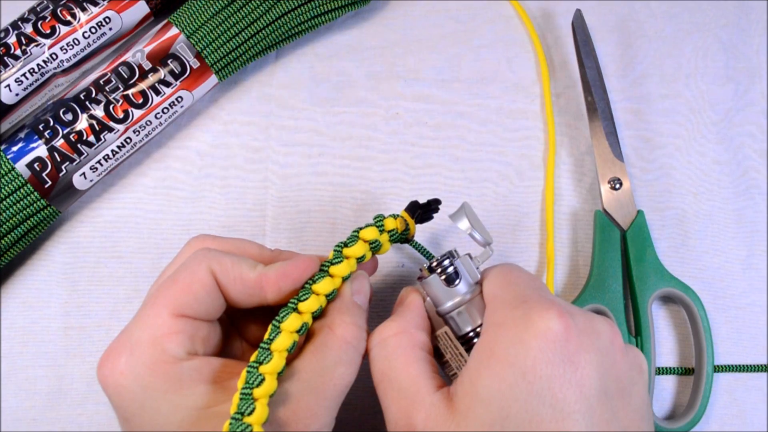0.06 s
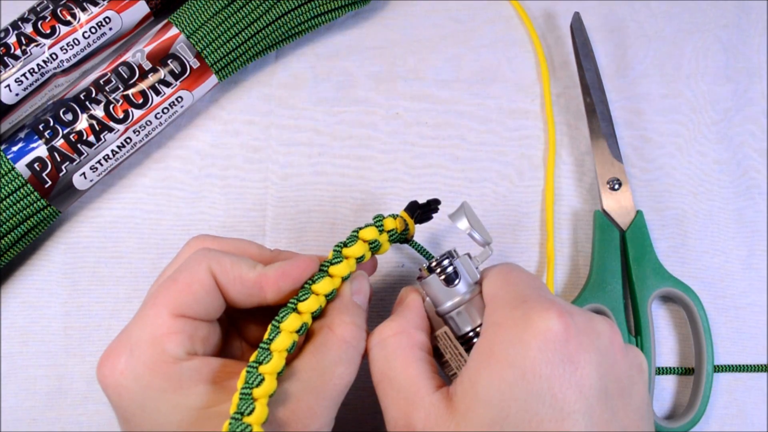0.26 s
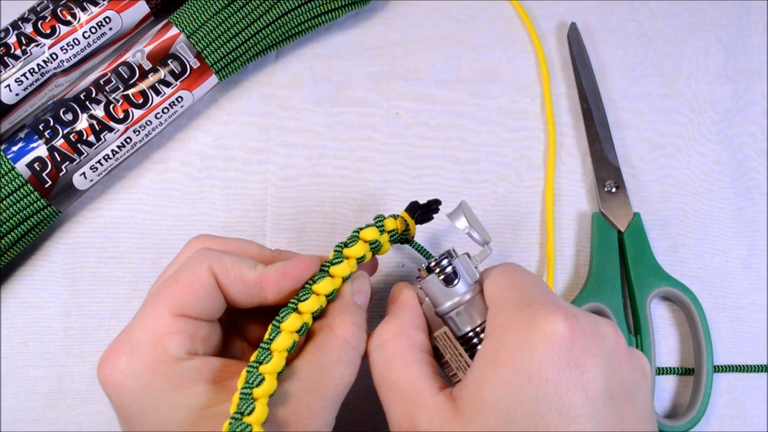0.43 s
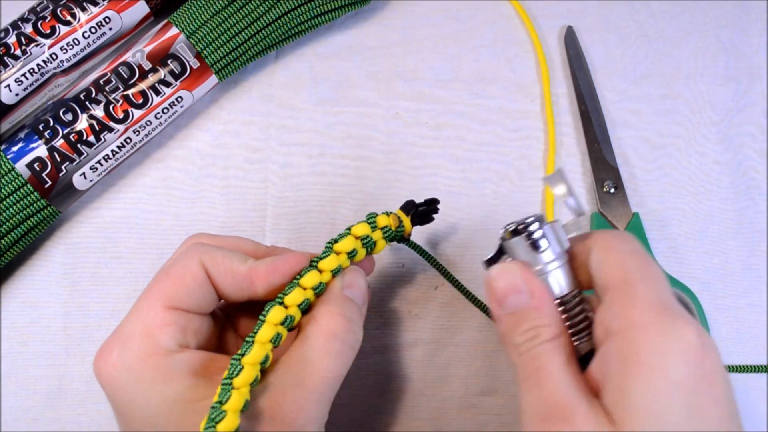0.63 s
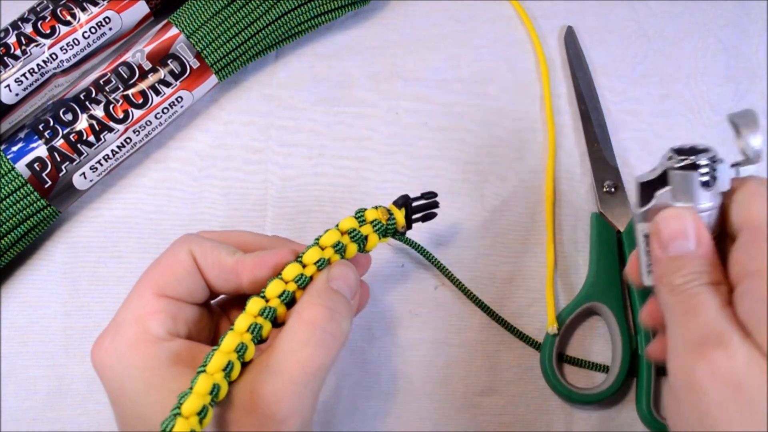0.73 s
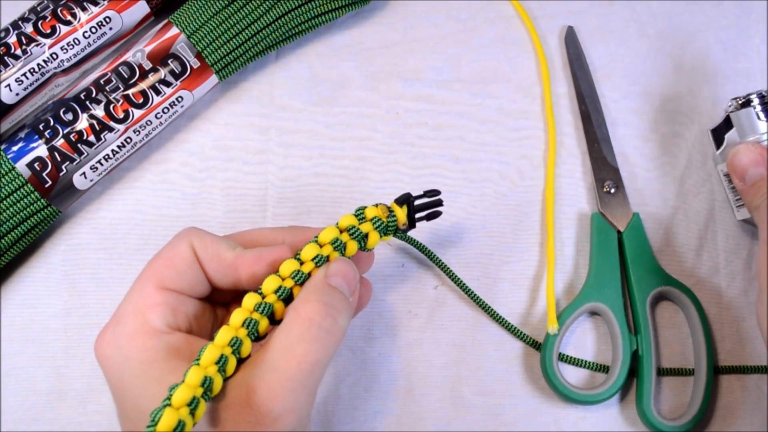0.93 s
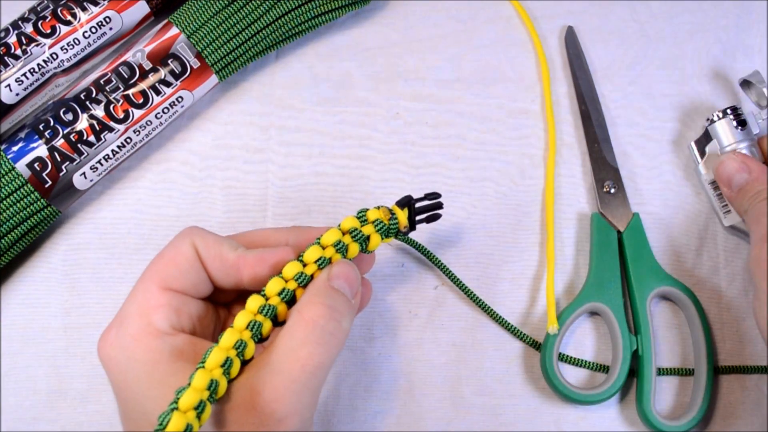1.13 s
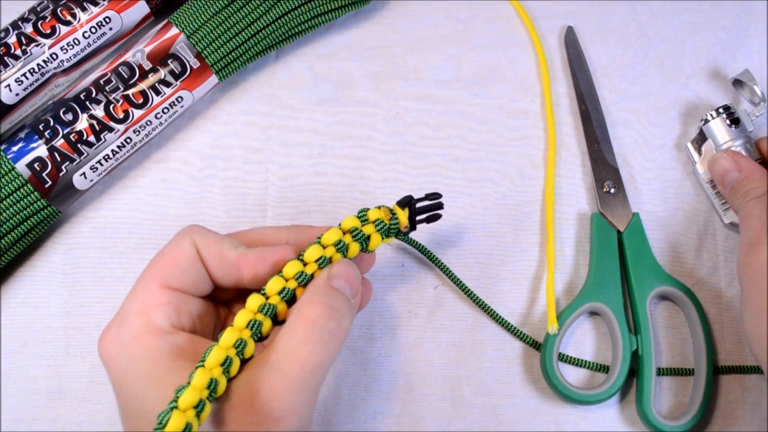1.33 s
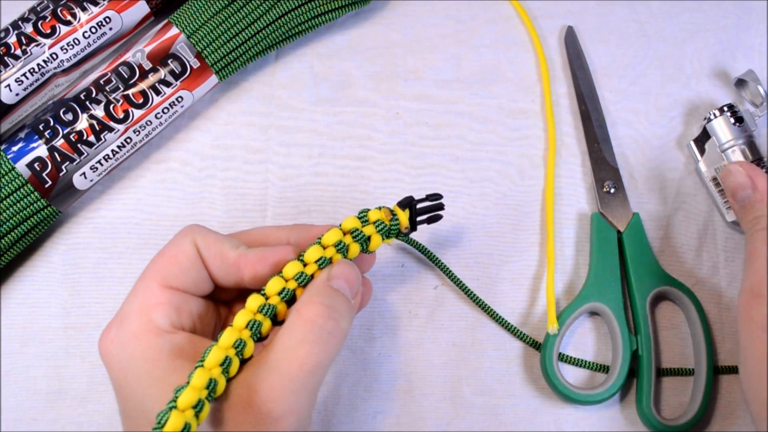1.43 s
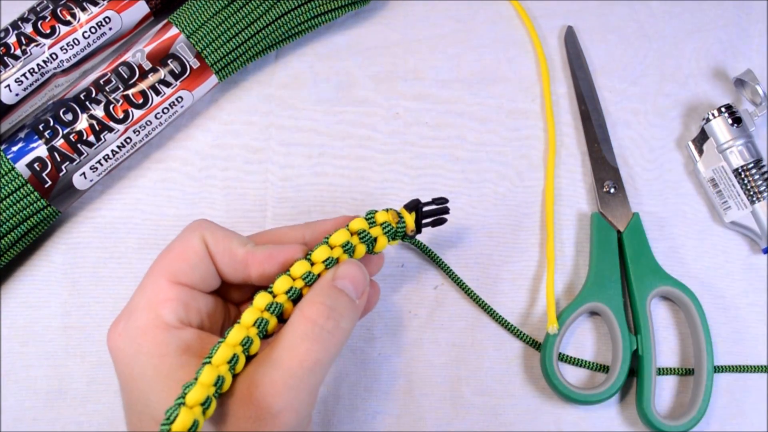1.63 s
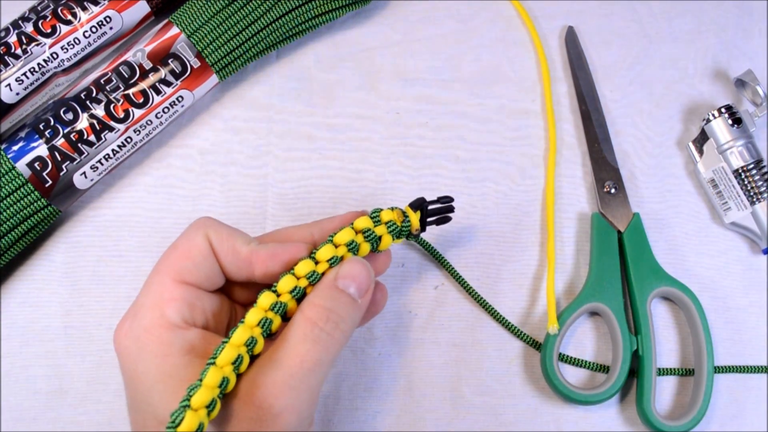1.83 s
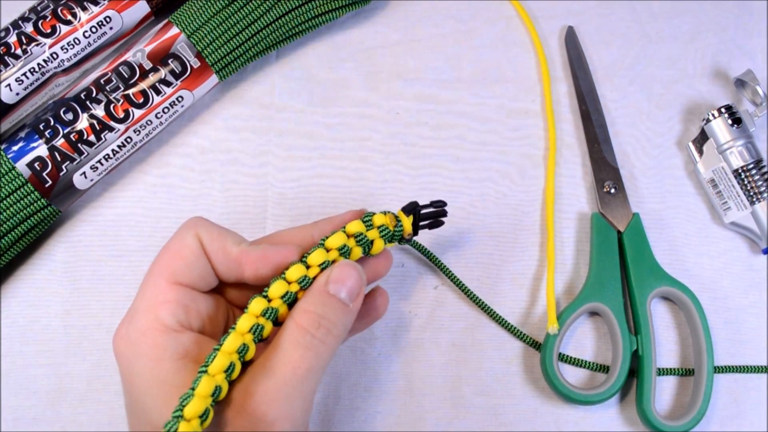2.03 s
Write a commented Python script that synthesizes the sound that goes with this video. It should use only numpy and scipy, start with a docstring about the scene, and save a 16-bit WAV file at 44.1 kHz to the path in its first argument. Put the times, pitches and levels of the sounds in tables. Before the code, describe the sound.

A jet lighter hisses steadily, close and slightly whistling, until 0.6 seconds, when a loud, hollow table bump rattles steel scissors. The hiss turns breathier, swells brightly around 0.9 with small hand brushes, then dulls and fades by 1.5. A softer thump at 1.2 leads into faint cloth rubbing. Another dull knock comes at 1.9, then a tiny hard clink at 2.05. Quiet small room, faint hum and thin whine.

```python
"""A jet lighter hisses against a cord end, close to the microphone, then swings clear and fades as it turns away:
turbulent noise, coloured by a reflection from the table. The hand bumps the table and rattles a pair of steel
scissors, lands again, slides over the cloth and lays the lighter down with a knock and a small clink:
damped modes and bursts of noise. A quiet room hums behind: steady tones and coloured noise."""
import sys
import numpy as np
from scipy import signal
from scipy.fft import rfft, irfft, next_fast_len
from scipy.io import wavfile
from scipy.ndimage import map_coordinates

SR = 44100
rng = np.random.default_rng(int(sys.argv[2]) if len(sys.argv) > 2 else 0)


def master(y):
    """Save y as 16-bit WAV."""
    cut = np.clip(np.atleast_2d(y).T, -1, 1)
    pcm = np.round(cut * 32767)  # scale
    wavfile.write(sys.argv[1], SR, pcm.astype(np.int16))


N = 91816


def amp(db):
    """Decibel law: the amplitude gain of a level in dB."""
    return 10 ** (np.asarray(db) / 20)


def unit(x):
    """Normalisation: x at rms 1."""
    return x / np.sqrt(np.mean(x ** 2) + 1e-20)


def along(points, hz):
    """Logarithmic frequency scale: (hz, value) points interpolated along it."""
    f, v = np.transpose(points)
    return np.interp(np.log(hz + 1), np.log(f + 1), v)


def curves(rows):
    """Linear interpolation in time: one value per sample for each column after the time."""
    s, *columns = np.transpose(rows)
    return [np.interp(np.arange(N) / SR, s, column) for column in columns]


def wobble(rate):
    """Slow random modulation: a smooth curve through random knots, rate of them a second."""
    knots = rng.standard_normal(1024)
    return map_coordinates(knots, [np.arange(N) * rate / SR], mode="mirror")


def filtered(x, response):
    """Linear filtering: the spectrum of x times a response of frequency."""
    m = next_fast_len(N + SR // 2)
    spectrum = rfft(x, m) * response(np.fft.rfftfreq(m, 1 / SR))
    return irfft(spectrum, m)[..., :N]


def noise(spectrum):
    """Coloured noise: white noise shaped by a spectral density, at rms 1."""
    return unit(filtered(rng.standard_normal(N), lambda hz: amp(along(spectrum, hz))))


def bands(rows):
    """Resonance driven by noise: narrow bands from rows of (centre_hz, width_hz, rms_db)."""
    total = np.zeros(N)
    for hz, width, db in rows:
        band = filtered(rng.standard_normal(N), lambda f: 1 / (1 + (1.24 * (f - hz) / width) ** 2))
        total += amp(db) * unit(band)
    return total


def fade(t, t60):
    """Exponential decay: 60 dB down after t60 seconds."""
    return np.exp(-np.log(1000) * t / t60)


def ring(modes, t, tilt_db=0, pivot_hz=350):
    """Modal superposition: damped sines, tilted in dB per octave about a pivot, varied at each blow."""
    total = 0
    for hz, db, t60 in modes:
        gain = amp(db + tilt_db * np.log2(hz / pivot_hz) + rng.normal())
        total = total + gain * fade(t, t60) * np.sin(2 * np.pi * hz * t)
    return total


def add(track, s, sound):
    """Superposition: mix a sound in from time s."""
    start = round(s * SR)
    track[start:] += sound[:N - start]


def flame():
    """Jet turbulence radiates broadband noise; the table reflection lags and so comb-filters it."""
    # flame playing on the cord: time_s, level_db
    on_cord = [(0, -35), (.1, -35), (.6, -35), (.68, -36), (.76, -38.5), (.85, -56), (1, -67)]
    # flame in open air: time_s, level_db, treble_db as the nozzle faces or leaves the microphone
    in_air = [(.6, -51, -2), (.66, -41.5, -7), (.74, -41.5, -3.5), (.79, -39.5, 5), (.83, -36, 5),
              (.855, -36.5, 2), (.9, -32, 2), (.95, -35.5, 0), (.99, -36.5, 2.5), (1.03, -38, -1),
              (1.07, -41, -0.5), (1.17, -40.5, -3.5), (1.29, -45.5, -8.5), (1.42, -53.5, -14),
              (1.56, -85, -15)]
    # delay of the table reflection, growing as the lighter lifts: time_s, lag_ms
    table_lag = [(.6, 0.3706), (.7, .38), (.8, .47), (.87, 0.5), (1, 0.73), (1.15, 0.93), (1.5, 1)]
    # relative spectral densities of the two jets: frequency_hz, density_db
    cord_jet = [(40, -39), (100, -23), (150, -15.5), (330, -12), (480, -11.5), (660, -9.5), (800, -3.5),
                (1200, -8.5), (1600, -1.5), (2100, -10.5), (2600, -12.5), (3100, -15.5), (3700, -11),
                (4400, -20.5), (4800, -17.5), (5400, -19.5), (6600, -18.5), (7900, -27), (8650, -25.5),
                (9400, -10), (10200, -18.5), (10950, -19), (12300, -27.5), (15500, -33)]
    air_jet = [(40, -34), (100, -17), (145, -8.5), (220, -11.5), (340, -5), (480, -5.5), (640, -2),
               (800, 3.5), (1050, 0), (1250, 0), (1600, 1), (2200, -2.5), (3000, -7), (3800, -10.5),
               (6000, -13), (8700, -19), (9800, -14.5), (11000, -17), (13000, -31), (15500, -38)]
    # resonances of the pocket between hand and nozzle: centre_hz, width_hz, level_db against the jet noise
    pocket = [(940, 33, -12.5), (1095, 50, -5), (1445, 58, -8), (1555, 15, -11), (2020, 120, -10),
              (2255, 87, -15), (2870, 110, -20.5)]
    # faint airy pitch of the jet on the cord: centre_hz, width_hz, level_db against the jet noise
    whistle = [(800, 24, -13.5)]
    treble_hz, flutter_db, table_echo = 3330, 0.62, 0.4  # echo as an amplitude ratio

    cord_db, = curves(on_cord)
    air_db, treble_db = curves(in_air)
    lag_ms, = curves(table_lag)
    cord_noise = unit(noise(cord_jet) + bands(pocket) + bands(whistle))
    free = noise(air_jet)
    roar = filtered(free, lambda hz: 1 / (1 + (hz / treble_hz) ** 4))
    air_noise = roar + amp(treble_db) * (free - roar)
    jet = amp(cord_db) * cord_noise + amp(air_db) * air_noise
    jet = jet * amp(flutter_db * wobble(45.6))
    reflection = map_coordinates(jet, [np.arange(N) - lag_ms * SR / 1000])
    return jet + table_echo * reflection


def near_walls(x):
    """Early reflections: eight equally strong delayed copies interfere and ripple the spectrum."""
    longest_s = 0.014
    lags = rng.uniform(longest_s / 10, longest_s, size=8)
    return sum(np.pad(x, (round(lag * SR), 0))[:N] for lag in lags) / np.sqrt(len(lags))


def bumps():
    """Impact excitation: a soft contact flexes the table top, rings its modes and leaves a dull thud."""
    # contacts with the table: start_s, level_db, tilt_db per octave, contact_ms
    blows = [(0.6035, -14, -3.5, 0.4), (0.6231, -29.5, 8.5, 0.38), (0.6508, -32.5, -8, 0.92),
             (1.1891, -23.5, 1, 0.55), (1.9049, -23, -2.5, 1.35), (1.9213, -44, -2, 1.3),
             (1.983, -41.5, -6.5, 1.6), (2.009, -47.5, -1, 0.44), (1.847, -49.5, 2, 1.1)]
    # modes of the table top: pitch_hz, level_db, t60_s
    table_modes = [(146, -6, 0.23), (201.8, 0, 0.11), (241, -2.5, 0.072), (306.6, -3.5, 0.14),
                   (322, -12.5, 0.17), (406, -7.5, 0.1), (458, -5, 0.12), (494.5, -6, 0.11),
                   (497, -14, 0.11), (599, -12.5, 0.16), (706, -5.5, 0.047), (819, -13.5, 0.18),
                   (867, -19, 0.13)]
    # relative density of the table's crowded resonances, heard as noise: frequency_hz, density_db
    thud_spectrum = [(50, -48), (130, -6.5), (250, -4.5), (500, -3), (750, -11.5), (1200, -14.5),
                     (2500, -47), (6000, -52)]
    knock_hz, knock_db, knock_t60_s = 410, 11.5, 0.015  # the first flex of the board under the blow
    mode_rise_s = 0.0013  # the modes build up as the wave crosses the board
    thud_t60_s, thud_rise_s = 0.15, 0.0033
    bass_cut_hz = 92  # the microphone picks up little deep bass from the blows

    out, t = np.zeros(N), np.arange(N) / SR
    knock = amp(knock_db) * np.sin(2 * np.pi * knock_hz * t) * fade(t, knock_t60_s)
    for s, db, tilt_db, contact_ms in blows:
        # a half-sine force: a longer contact is duller
        push = np.sin(np.pi * np.clip(t * 1000 / contact_ms, 0, 1))[:SR // 50]
        modes = ring(table_modes, t, tilt_db) * (1 - np.exp(-t / mode_rise_s))
        thud = noise(thud_spectrum) * fade(t, thud_t60_s) * (1 - np.exp(-t / thud_rise_s))
        add(out, s, amp(db) * signal.fftconvolve(knock + modes + thud, push / push.sum()))
    highpass = signal.butter(4, bass_cut_hz, "highpass", fs=SR, output="sos")
    return signal.sosfilt(highpass, out)


def clinks(hits, modes, crack_spectrum, crack_db, crack_t60):
    """Impact of hard bodies: a broadband crack and quickly damped modes."""
    out, t = np.zeros(N), np.arange(N) / SR
    for s, db in hits:
        crack = amp(crack_db) * noise(crack_spectrum) * fade(t, crack_t60)
        add(out, s, amp(db) * (ring(modes, t) + crack))
    return out


def scissors():
    """Modal ringing of steel: two close hits rattle the blades."""
    # hits: start_s, level_db
    rattle_hits = [(.6066, -22.5), (.6076, -20.5)]
    # modes of the scissors: pitch_hz, level_db, t60_s
    steel_modes = [(2850, -11.5, 0.038), (4170, -14.5, 0.057), (6900, -19, 0.018), (9270, 0.5, 0.011),
                   (10500, -20, 0.011), (10710, 3.5, 0.012), (12410, -18, 0.031), (12500, -18, .035)]
    # relative density of the contact noise: frequency_hz, density_db
    contact_spectrum = [(1500, -3), (3000, 1.5), (7000, -16), (10500, 0), (13000, -2), (16000, -43)]
    return clinks(rattle_hits, steel_modes, contact_spectrum, crack_db=3, crack_t60=0.011)


def lighter_case():
    """Modal ringing of a small case: the lighter settles in three light hits."""
    # hits: start_s, level_db
    settling_hits = [(2.0498, -36), (2.0545, -37), (2.0562, -44)]
    # modes of the case: pitch_hz, level_db, t60_s
    case_modes = [(4820, -5, 0.031), (5490, -0.5, 0.017), (6800, -9, .022), (8260, -15, 0.021),
                  (8930, -3.5, 0.037), (9800, -2, .02), (10100, -7, 0.018)]
    # relative density of the contact noise: frequency_hz, density_db
    contact_spectrum = [(1500, -9), (5000, -5), (10000, 0), (11500, -14), (16000, -25)]
    return clinks(settling_hits, case_modes, contact_spectrum, crack_db=-0.5, crack_t60=0.021)


def shudder():
    """Low resonance driven by noise: a short judder as the hand lifts off the table."""
    # one judder: peak_s, half_length_s (to 1/e), pitch_hz, width_hz, level_db
    s, half, hz, width, db = (.74, .04, 96, 20, -41)
    t = np.arange(N) / SR
    return bands([(hz, width, db)]) * np.exp(-((t - s) / half) ** 2)


def slides():
    """Friction noise: hand and lighter rub unevenly over the cloth-covered table."""
    # strokes: start_s, length_s, level_db
    strokes = [(1.217, 0.3, -46.5), (1.889, .12, -41), (2.034, 0.0777, -51.5)]
    # relative density of the rubbing: frequency_hz, density_db
    cloth = [(40, -27), (140, 4.5), (190, -3), (400, 2), (700, -8), (1500, -14.5), (4000, -39),
             (10000, -30), (15000, -40)]
    edge_s, rough_db = 0.014, 3

    t = np.arange(N) / SR
    envelope = np.zeros(N)
    for s, length, db in strokes:
        edge_distance = np.minimum(t - s, s + length - t)
        envelope += amp(db) * np.clip(edge_distance / edge_s, 0, 1)
    return envelope * noise(cloth) * amp(rough_db * wobble(70))


def brushes():
    """Friction noise of skin and sleeve: short grainy swishes, each with its own treble limit."""
    # touches: peak_s, half_length_s (to 1/e), level_db, upper_edge_hz
    touches = [(0.754, 0.0072, -40.5, 12000), (0.835, 0.014, -38.5, 13000), (0.896, 0.021, -38.5, 8950),
               (1.021, 0.023, -42, 7000), (1.2, 0.014, -43.5, 3800), (1.288, .01, -47, 3000),
               (1.456, 0.013, -56.5, 12000), (1.522, 0.023, -59, 12000), (1.92, 0.014, -53.5, 12000),
               (1.972, 0.011, -63, 12000), (2.009, 0.04, -54.5, 11000)]
    # relative density of the grain: frequency_hz, density_db
    brush_spectrum = [(1000, -4), (3000, -0.5), (6500, 1), (10500, -2), (13000, -15), (16000, -25)]
    rough_db = 2.5

    t, out = np.arange(N) / SR, np.zeros(N)
    grain = unit(noise(brush_spectrum) * amp(rough_db * wobble(400)))
    for s, half, db, edge_hz in touches:
        swish = unit(filtered(grain, lambda hz: 1 / (1 + (hz / edge_hz) ** 6)))
        out += amp(db) * np.exp(-((t - s) / half) ** 2) * swish
    return out


def room(x):
    """Reverberation: convolution with a decaying noise tail, shorter in the treble."""
    # decay time of the small room: frequency_hz, t60_s
    walls = [(150, 0.11), (2000, 0.083), (12000, 0.053)]
    hz, t, z = signal.stft(rng.standard_normal(SR // 2), SR, nperseg=256)
    decaying = z * fade(t, along(walls, hz)[:, None])
    tail = signal.istft(decaying, SR, nperseg=256)[1]
    delayed = np.pad(x, (SR // 200, 0))  # 5 ms ahead of the tail
    return signal.fftconvolve(delayed, tail / np.linalg.norm(tail))[:N]


def background():
    """Stationary noise and tones: room air, a distant fan, a slightly unsteady hum and a thin electrical whine."""
    # relative density of the room air: frequency_hz, density_db
    room_tone = [(25, -14), (60, -15), (125, -7.5), (210, -10.5), (265, -4), (320, -7), (480, -8),
                 (620, -9), (950, -8), (1500, -11), (2300, -18.5), (3300, -16.5), (4600, -22), (8000, -23),
                 (15000, -26)]
    # narrow bands of the fan's rush: centre_hz, width_hz, rms_db
    fan_bands = [(2675, 114, -62.5), (3744, 144, -62)]
    # steady tones: pitch_hz, rms_db
    tones = [(267, -55.5), (461, -64), (525, -65.5), (15668, -69)]
    room_db = -52.5

    t = np.arange(N) / SR
    hum = np.zeros(N)
    for hz, db in tones:
        phase = 2 * np.pi * hz * t + 0.4 * wobble(6.2)  # a slow phase drift, in radians
        hum += amp(db) * np.sqrt(2) * np.sin(phase)
    return amp(room_db) * noise(room_tone) + bands(fan_bands) + hum


def scene():
    """Superposition at one microphone: direct sound, reflections and background, alike in both channels."""
    near_walls_db, wet_db = -9.5, -16.5
    jet = flame()
    near = jet + amp(near_walls_db) * near_walls(jet)
    near = near + bumps() + scissors() + lighter_case() + shudder() + slides() + brushes()
    mono = near + amp(wet_db) * room(near) + background()
    return np.array([mono, mono])


def record(dry):
    """Band limitation: only frequencies below the limit pass."""
    top_hz = 16000
    return filtered(dry, lambda hz: hz < top_hz)


dry = scene()
out = record(dry)
master(out)
```